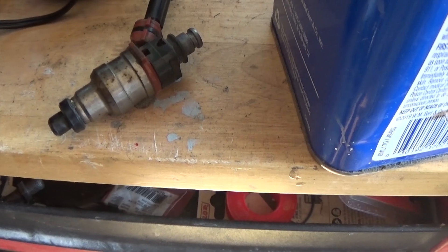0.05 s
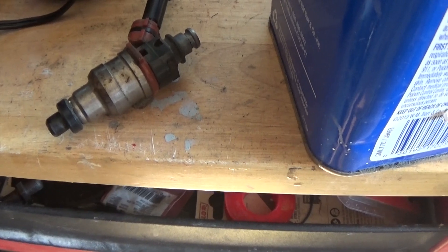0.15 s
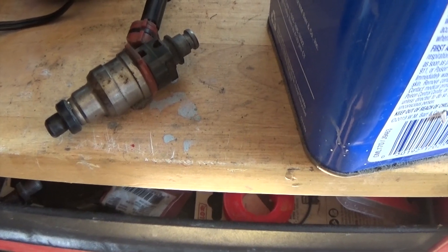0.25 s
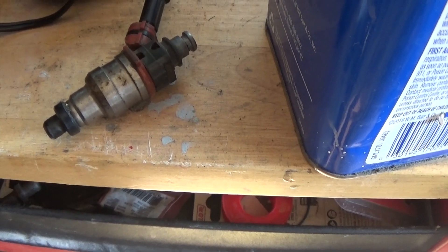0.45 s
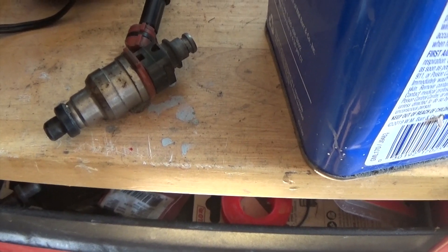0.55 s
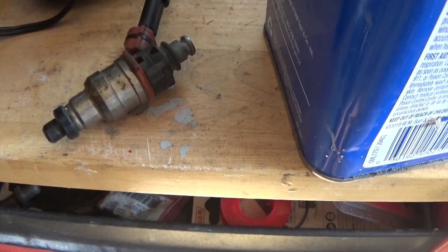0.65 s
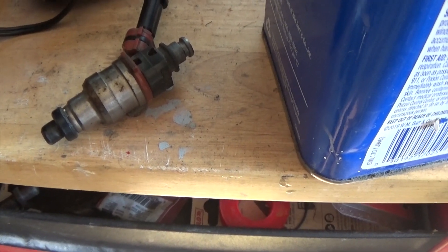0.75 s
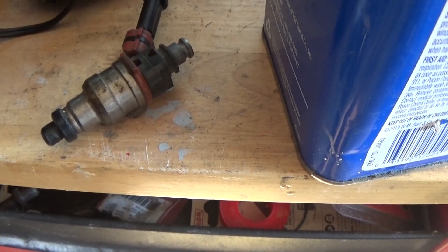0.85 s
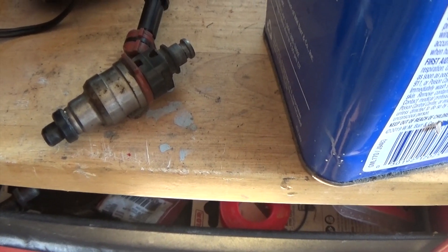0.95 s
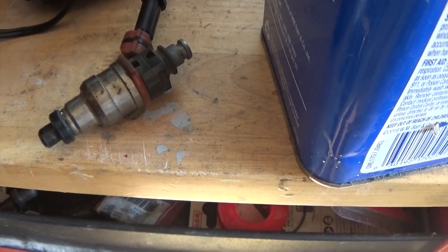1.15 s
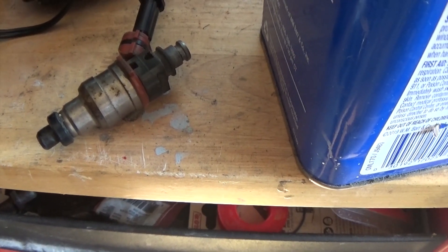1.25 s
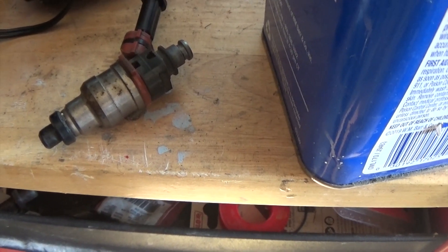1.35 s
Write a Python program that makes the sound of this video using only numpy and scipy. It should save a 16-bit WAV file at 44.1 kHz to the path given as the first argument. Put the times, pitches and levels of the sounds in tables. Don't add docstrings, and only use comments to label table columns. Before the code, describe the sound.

A fuel injector clicks sharply, very close, in three quick pairs: loud opening snaps at about 0.2, 0.63 and 1.06 seconds, each followed 0.04 to 0.06 seconds later by a softer closing tick. The clicks are bright, dry and metallic, with brief steel ringing, a slight wooden knock and short garage reflections. Faint air and low hum continue underneath; a distant bird chirps around 0.92 to 1.1 seconds.

```python
import sys
import numpy as np
from scipy import signal
from scipy.io import wavfile

SR = 44100
rng = np.random.default_rng(int(sys.argv[2]) if len(sys.argv) > 2 else 0)


def undo_db(level):
    steps = np.asarray(level, float) / 20
    return 10 ** steps


def bounce(signal):
    frames = np.transpose(np.atleast_2d(signal))
    limited = np.clip(frames, -1, 1)
    pcm = np.round(limited * 32767).astype(np.int16)
    wavfile.write(sys.argv[1], SR, pcm)


N = 61739

# t/s, peak level/dB
OPENS = [
    (0.2027, -4),
    (0.6311, -3.5),
    (1.06, -4.5),
]
# t/s, peak level/dB
CLOSES = [
    (.2404, -9.5),
    (.6895, -9.5),
    (1.1206, -9.5),
]
SNAP_LOW_CUT_HZ = 2470


def rms_one(x):
    return x / np.sqrt(np.mean(x ** 2) + 1e-20)


def at_hz(points, hz):
    f, value = np.transpose(points)
    return np.interp(np.log(hz), np.log(f), value)


def cut(x, hz, kind, order):
    return signal.sosfilt(signal.butter(order, hz, kind, fs=SR, output="sos"), x)


def resonate(x, hz, width_hz):
    r = np.exp(-np.pi * width_hz / SR)
    poles = [1, -2 * r * np.cos(2 * np.pi * hz / SR), r * r]
    return signal.lfilter([(1 - r * r) / 2, 0, (r * r - 1) / 2], poles, x + 1e-18)


def ring(clicks, hz, t60):
    r, w = undo_db(-60 / (t60 * SR)), 2 * np.pi * hz / SR
    return signal.lfilter([0, np.sin(w)], [1, -2 * r * np.cos(w), r * r], clicks + 1e-18)


def late(x, s):
    return np.concatenate([np.zeros(int(s * SR)), x])[:N]


def bands(low_hz, high_hz):
    edges = 20 * 2 ** np.arange(0, 9.9, 1 / 3)
    return [(np.sqrt(a * b), signal.butter(2, [a, b], "band", fs=SR, output="sos"))
            for a, b in zip(edges, edges[1:]) if low_hz < a < high_hz]


def spread(pair, alike):
    alike = np.clip(alike, 0, 1)
    middle, side = np.sqrt(1 + alike) * pair[0], np.sqrt(1 - alike) * pair[1]
    return middle + side * [[1], [-1]]


def blows(events):
    s, db = np.transpose(events)
    strike_spread_db = 0.27
    clicks = np.zeros(N)
    clicks[(s * SR).astype(int)] = undo_db(db + strike_spread_db * rng.standard_normal(len(s)))
    return clicks


def snap(events, peaks, bounces):
    out = np.zeros(N)
    for k, (hz, width_hz, db) in enumerate(peaks):
        force = blows(events)
        force = force + sum(undo_db(b_db) * late(force, s) for s, b_db in bounces)
        width_hz = 1.39 * width_hz
        swell = resonate(resonate(force, hz, width_hz), hz, width_hz)
        out += (-1) ** k * undo_db(db) * swell
    return undo_db(21) * out


def opening_snap():
    # f/Hz, width/Hz, level/dB
    open_peaks = [(2890, 580, -7), (3350, 750, -10.5), (4224, 414, 1), (5310, 500, -19.5), (6346, 217, -5),
                  (7400, 320, -14.5), (7900, 256, -7), (8590, 300, -10.5), (9940, 400, -12.5),
                  (10600, 350, -11), (11700, 240, -10.5), (13170, 690, -12), (15000, 310, -17),
                  (15600, 460, -28)]
    # delay/s, level/dB
    open_bounces = [
        (.0009, -21),
        (.0016, -22.5),
    ]
    return snap(OPENS, open_peaks, open_bounces)


def seating_snap(events):
    # f/Hz, width/Hz, level/dB
    seat_peaks = [(2726, 615, -4), (3260, 607, 1.5), (4127, 437, 2), (5800, 330, -9), (5930, 240, 0),
                  (6770, 73, -0.5), (7780, 580, -7.5), (9726, 490, -1.5), (11110, 280, -13),
                  (12090, 290, -7.5), (13600, 410, -7), (15500, 270, -20)]
    # delay/s, level/dB
    seat_bounces = [
        (.0009, -39),
        (.003, -48),
    ]
    return snap(events, seat_peaks, seat_bounces)


def guide_graze():
    # t/s, peak level/dB
    grazes = [
        (1.1193, -21),
    ]
    return cut(seating_snap(grazes), 3500, "high", order=2)


def body(events, modes, level_db):
    longest_t60_s = 0.5
    return sum(ring(blows(events) * undo_db(db + level_db), hz, min(t60, longest_t60_s))
               for hz, db, t60 in modes)


def crowd(rows, count=6):
    places = (np.arange(count) + rng.uniform(.2, .8, (len(rows), count))) / count * 2 - 1
    return [(hz + spread_hz * u, db, t60 * rng.uniform(0.57, 1.36))
            for (hz, db, t60, spread_hz), row in zip(rows, places) for u in row]


def steel():
    # centre f/Hz, level/dB, t60/s, spread/Hz
    open_ring = [(3505, -27.5, 0.13, 163), (4070, -25.5, 0.12, 200), (6120, -23.5, 0.13, 160),
                 (6670, -23, 0.11, 200), (8500, -40, 0.091, 308)]
    close_ring = [(3490, -18.5, 0.13, 200), (3990, -21, 0.1, 130), (6200, -15.5, 0.14, 130),
                  (6470, -10.5, 0.14, 150), (8400, -25, 0.16, 80), (9500, -17.5, 0.17, 270)]
    # f/Hz, level/dB, t60/s
    lifted_tone = [(2928, -40, .5)]
    seated_tones = [(2946, -38.5, .31), (5797, -39.5, .34)]
    lifted = np.cumsum(np.sign(blows(OPENS)) - np.sign(blows(CLOSES)))
    rings = body(OPENS, crowd(open_ring), -18) + body(CLOSES, crowd(close_ring), -26)
    rings = rings + lifted * body(OPENS, lifted_tone, 0) + body(CLOSES, seated_tones, 0)
    return late(cut(rings, SNAP_LOW_CUT_HZ, "high", order=2), 0.001)


def bench():
    # f/Hz, level/dB, t60/s
    knock = [(662, -36, 0.021), (1296, -41, 0.023)]
    # f/Hz, level/dB, t60/s
    wood = [(379.4, -53.5, 0.12), (429.4, -55.5, 0.18)]
    open_db, wood_lag_s = -13, 0.00604
    both = [*CLOSES, *[(s, db + open_db) for s, db in OPENS]]
    thud = body(both, knock, 0) + late(body(both, wood, 9.4), wood_lag_s)
    return cut(thud, 260, "high", order=2)


def side_echoes(snaps):
    # delay/s, level/dB, centre f/Hz, width/Hz
    surfaces = [(0.00044, -5.5, 3700, 670), (0.000884, -8, 5500, 1600), (.0006, -14, 4300, 13000)]
    return sum(undo_db(db) * late(resonate(snaps, hz, width_hz), s) for s, db, hz, width_hz in surfaces)


def garage(x, colour):
    # f/Hz, t60/s
    room_t60 = [(1500, 0.087), (3500, .19), (6500, 0.13), (10000, 0.13), (15000, 0.081)]
    # f/Hz, likeness 0-1
    room_likeness = [(1500, 1), (4000, 0.57), (6500, 0.43), (8500, 0.9), (12000, .995)]
    early_db, early_db_per_octave, early_t60_s = 10.5, -0.5, 0.019
    early_rise_s, room_rise_s = 0.00043, 0.0042
    t = np.arange(SR // 2) / SR
    white = rng.standard_normal((2, 2, len(t)))
    answer = 0
    for k, (hz, sos) in enumerate(bands(low_hz=900, high_hz=16000)):
        early = undo_db(early_db + early_db_per_octave * np.log2(hz / 8000) - 60 * t / early_t60_s)
        early = early * np.clip(t / early_rise_s, 0, 1)
        walls = undo_db(-60 * t / at_hz(room_t60, hz)) * np.clip(t / room_rise_s - 1, 0, 1)
        noise = spread(signal.sosfilt(sos, white[k % 2]), at_hz(room_likeness, hz))
        answer = answer + undo_db(at_hz(colour, hz)) * (early + walls) * noise
    return undo_db(-27.5) * signal.fftconvolve(x[None], answer, axes=1)[:, :N]


def garage_tails(opening, closing):
    # f/Hz, level/dB
    open_tail = [(1500, -21), (2800, -12), (4200, -16.5), (5300, 9.5), (6500, -16.5), (8500, -1.5),
                 (11000, -6.5), (15000, -13)]
    close_tail = [(1500, -21), (2800, -8.5), (3800, -1.5), (5000, -21.5), (6300, 16.5), (8000, -36),
                  (9700, 6), (14000, -14.5)]
    snap_gain = undo_db(-19.5)
    opened = garage(blows(OPENS) + snap_gain * opening, open_tail)
    return opened + garage(blows(CLOSES) + snap_gain * closing, close_tail)


def bird():
    # t/s, level/dB
    chirp = [
        (.91, -99),
        (.925, -64.5),
        (.945, -66),
        (.985, -68),
        (1.03, -59),
        (1.07, -74),
        (1.15, -99),
    ]
    # f/Hz, width/Hz, level/dB
    chirp_lines = [(6050, 500, 0), (6550, 700, -2), (7100, 500, -1)]
    scoop_s, scoop_hz, scoop_db = (.914, .938), (5850, 7200), -69
    t, pair = np.arange(N) / SR, rng.standard_normal((2, N))
    lines = sum(undo_db(db) * resonate(resonate(pair, hz, width_hz), hz, width_hz)
                for hz, width_hz, db in chirp_lines)
    smeared = undo_db(np.interp(t, *np.transpose(chirp))) * rms_one(spread(lines, 0.75))
    scoop = np.sin(2 * np.pi * np.cumsum(np.interp(t, scoop_s, scoop_hz)) / SR)
    gate = np.sin(np.pi * np.interp(t, scoop_s, [0, 1]))
    return smeared + undo_db(scoop_db) * gate * scoop


def hum():
    # f/Hz, width/Hz, rms level/dB
    hum_tones = [(60.7, 7.5, -83), (111.8, 10.8, -72), (147, 9, -80), (236, 3.34, -78)]
    white = rng.standard_normal((len(hum_tones), N + SR // 2))
    return sum(undo_db(db) * rms_one(resonate(resonate(w, hz, width_hz), hz, width_hz)[-N:])
               for w, (hz, width_hz, db) in zip(white, hum_tones))


def steady_noise(spectrum, low_hz, high_hz):
    # f/Hz, likeness 0-1
    likeness = [(60, 0.81), (130, 0.9), (290, 0.91), (640, 0.64), (1410, 0.38), (3100, 0.73), (6500, 0.63),
                (9000, 0.98)]
    # f/Hz, level/dB
    lean = [(60, -3), (240, 0.5), (950, -2.5), (3770, -1.0), (15000, -1)]
    white = rng.standard_normal((2, 2, N + SR // 2))
    out = 0
    for k, (hz, sos) in enumerate(bands(low_hz, high_hz)):
        lean_db = at_hz(lean, hz) * (hz < 8000) * np.array([[.5], [-.5]])
        noise = spread(signal.sosfilt(sos, white[k % 2])[:, -N:], at_hz(likeness, hz))
        out = out + undo_db(at_hz(spectrum, hz) + lean_db) * noise
    return rms_one(out)


def room_air():
    # f/Hz, level/dB per Hz
    air_spectrum = [(110, -64), (180, -34), (226, -14.5), (391, 0), (438, -3.5), (519, -3), (915, -1),
                    (14700, -21.5), (16500, -39)]
    # f/Hz, level/dB per Hz
    rumble_spectrum = [(13, -48), (22, -21), (65, -23), (119, 6), (189, -0.5), (220, -9), (290, -39),
                       (480, -120)]
    hiss = undo_db(-59.5) * steady_noise(air_spectrum, 165, 16000)
    return hiss + undo_db(-81) * steady_noise(rumble_spectrum, 28, 165)


def scene():
    opening, closing = opening_snap(), seating_snap(CLOSES)
    snaps = cut(opening + closing, SNAP_LOW_CUT_HZ, "high", order=2)
    ringing = steel() * undo_db(np.array([[-.7], [.7]]))
    injector = snaps + guide_graze() + bench() + ringing
    near = injector + side_echoes(snaps) * [[1], [-1]]
    around = garage_tails(opening, closing) + bird() + hum() + room_air()
    return cut(near, 17600, "low", order=12) + cut(around, 15850, "low", order=30)


def band_limit(x):
    return signal.sosfilt(signal.butter(12, 17160, fs=SR, output="sos"), x)


def record(dry):
    return band_limit(dry)


dry = scene()
out = record(dry)
bounce(out)
```